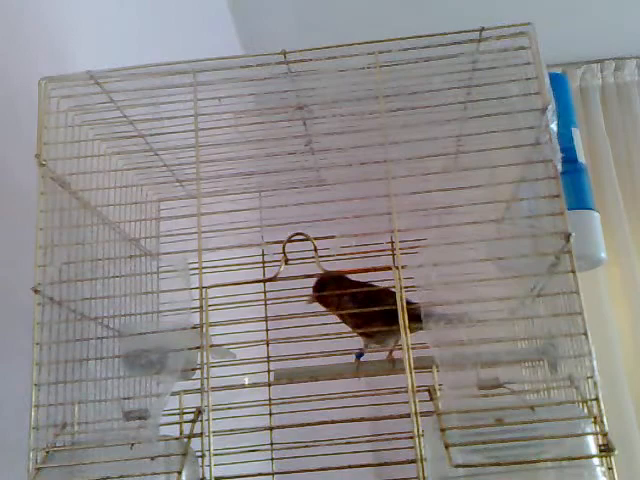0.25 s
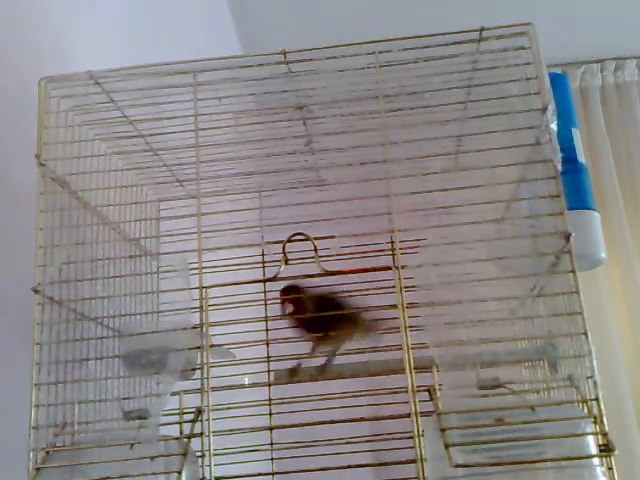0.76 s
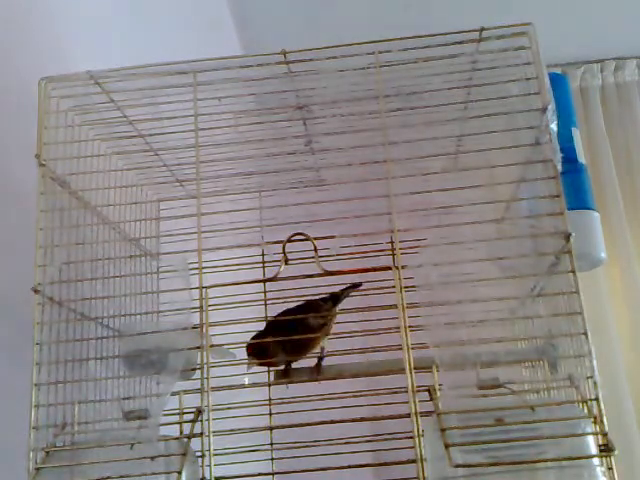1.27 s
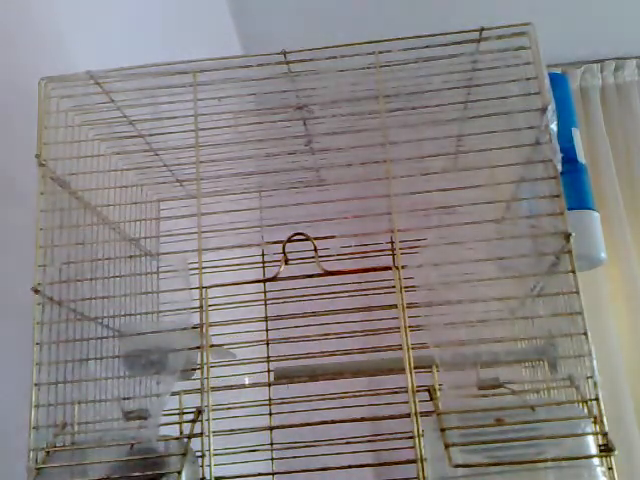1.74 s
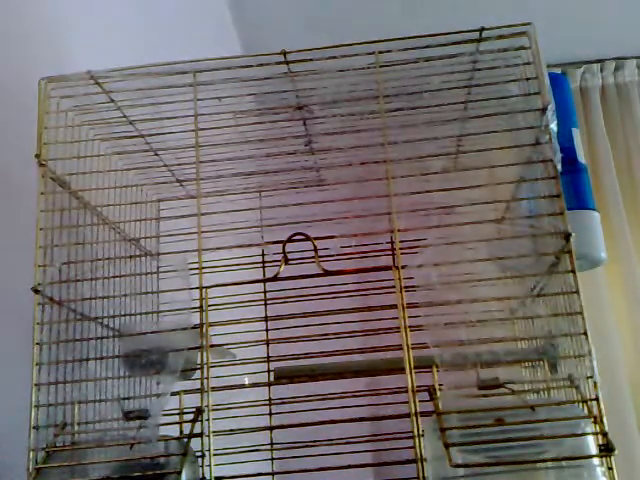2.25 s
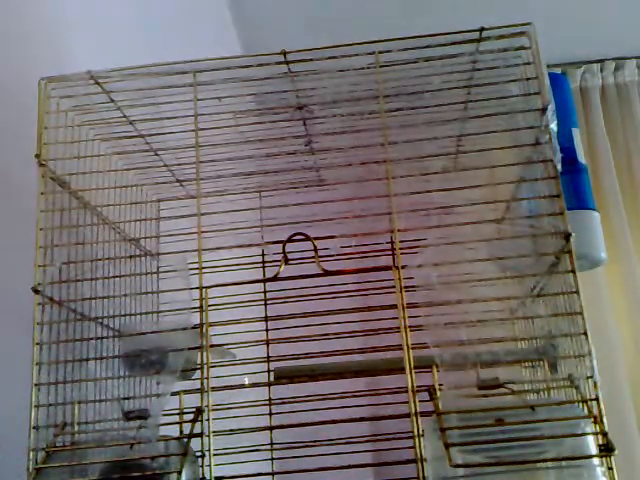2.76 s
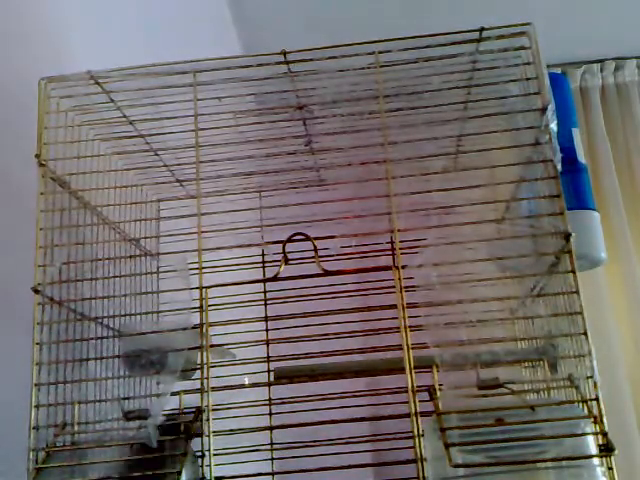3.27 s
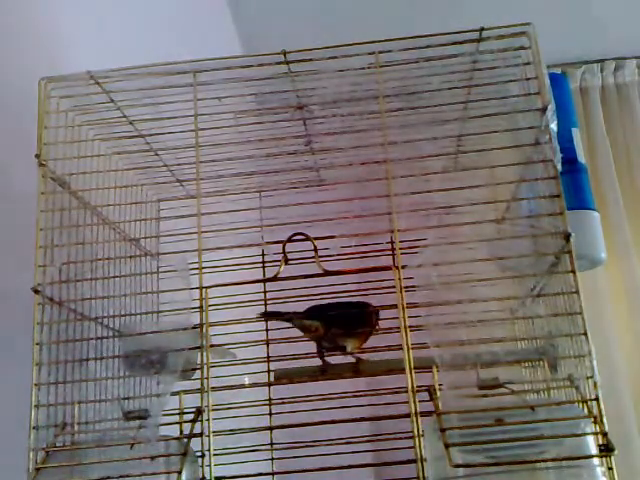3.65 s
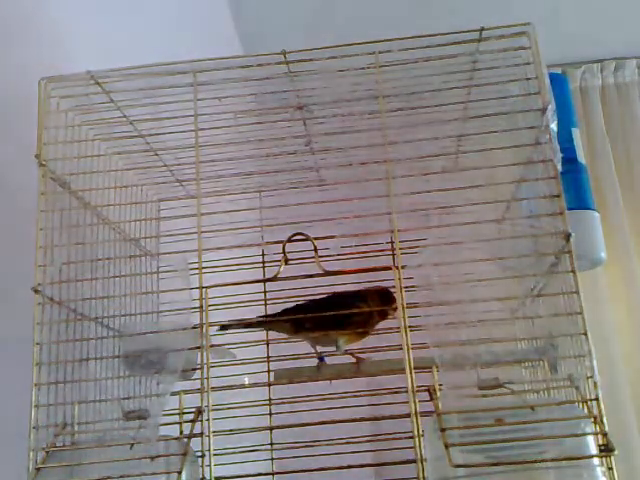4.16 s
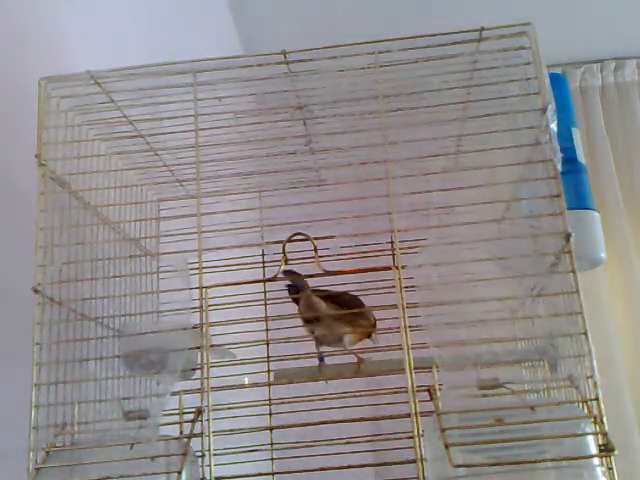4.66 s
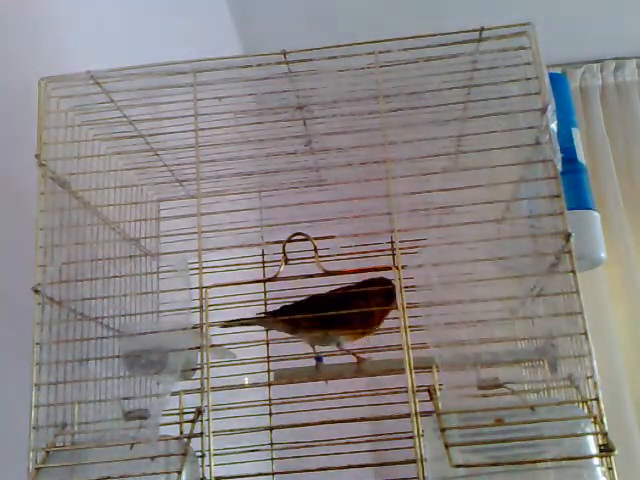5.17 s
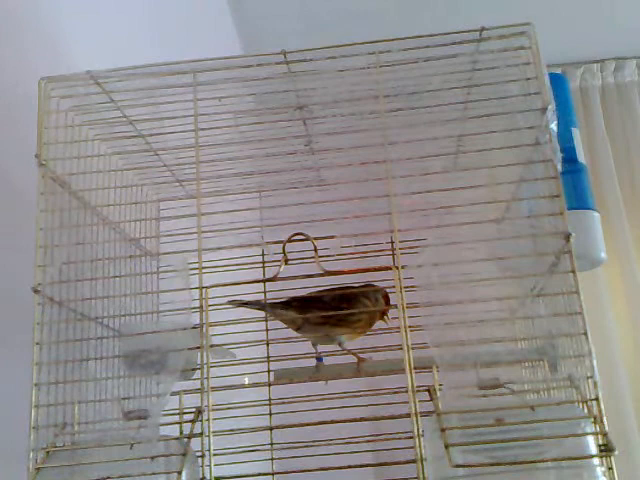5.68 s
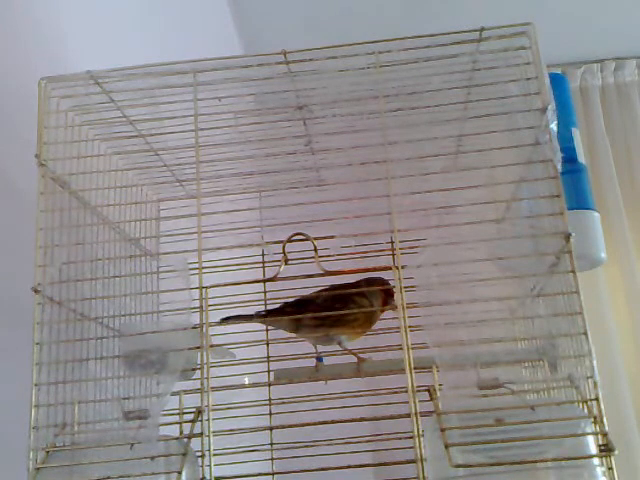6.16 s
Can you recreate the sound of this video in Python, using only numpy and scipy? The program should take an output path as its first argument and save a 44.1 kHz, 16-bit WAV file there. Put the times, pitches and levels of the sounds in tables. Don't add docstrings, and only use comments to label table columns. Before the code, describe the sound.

The sound opens on the tail of a high whistle, then at about 0.1 s a small finch close by gives a loud call: a rapid rising, fluttering buzz, a snapped, piercing whistle near 0.2 s, and a glide tumbling down until about 0.34 s. A short, small-room reflection follows, and the hiss sinks around 0.7 s before returning. Faint claw taps come near 0.9 and 1.25 s, then a clearer landing knock at 1.6 s, with soft scrabbles to 2.2 s. A thin wire tick falls at 2.6 s, light metallic bar ticks at 3.3 to 3.5 s, and dull tray touches between 4 and 4.6 s. At 5.35 s comes a second, brighter call: rough rising buzz, overlapping sharp whistles, and a falling glide ending by 5.6 s. Hiss dips again around 6 s, with one barely audible tick. Low rumble and faint stirred air continue throughout.

```python
import sys
import numpy as np
from scipy import signal
from scipy.fft import rfft, irfft, next_fast_len
from scipy.io import wavfile
from scipy.ndimage import uniform_filter1d

SR = 44100
rng = np.random.default_rng(int(sys.argv[2]) if len(sys.argv) > 2 else 0)


def master_out(mix):
    frames = np.transpose(np.atleast_2d(mix))
    ceiling = np.clip(frames, -1, 1)
    pcm = np.round(ceiling * 32767).astype(np.int16)
    wavfile.write(sys.argv[1], SR, pcm)


def volts(x):
    e = np.asarray(x, float) / 20
    return 10 ** e


N = 283058
LEAD = 4410

# time in seconds, pitch in Hz, level in dB, beak resonance in Hz.
BUZZ_CURVES = [
    [(.072, 1195, -44, 2504), (.09, 1334, -35, 2985), (.104, 1425, -22.5, 4400), (.136, 1832, -18.5, 3800),
     (.148, 1967, -12, 3700), (.16, 1955, -33.5, 4162), (.172, 1982, -51, 4475)],
    [(5.345, 1302, -43.5, 4437), (5.357, 1362, -21.5, 5150), (5.372, 1600, -15.5, 5600),
     (5.387, 1803, -16, 6700), (5.405, 1921, -15, 7300), (5.436, 1858, -30, 5600), (5.46, 1837, -34, 3700),
     (5.49, 1773, -41.5, 3700)],
]
# rate in Hz at start, rate in Hz at end, depth 0-1 at start, depth 0-1 at end.
BUZZ_FLUTTERS = [
    (622.7, 720, 0.1, 0.73),
    (597.4, 400, 0.2, 1),
]
# frequency in Hz, gain in dB.
THROAT_RESPONSE = [(1000, -19), (1400, -13), (2000, -16), (2500, -8), (3700, 0), (5500, -5), (7600, -7),
                   (8400, -36), (15000, -60)]
# frequency in Hz, density in dB per Hz.
BREATH_SPECTRUM = [(900, -35.5), (2200, -17), (3500, -12), (5500, -5.5), (7600, -13), (8600, -19),
                   (12000, -21.5), (15800, -24.5)]
# start in seconds, length in seconds, from Hz, to Hz, peak in dB.
WHISTLE_NOTES = [(-.06, 0.024, 6300, 2900, -7), (-.035, .02, 3583, 6550, -13),
                 (-.012, 0.016, 6300, 5000, -11), (0.165, .008, 5720, 6460, -21.5),
                 (0.168, .016, 6670, 6060, -15.5), (0.176, .014, 3192, 3210, -30),
                 (0.186, .005, 7644, 5470, -28.5), (.188, 0.02, 5203, 5127, -4.5),
                 (.204, .009, 5150, 5275, -7.5), (.211, .014, 5218, 5190, -8.5),
                 (.226, .03, 6000, 5400, -35), (0.262, .036, 5750, 5710, -20),
                 (0.301, .028, 5760, 5560, -39.5), (5.441, .008, 4994, 5180, -17),
                 (5.455, .011, 5240, 5100, -22.5), (5.448, .009, 3860, 3650, -15.5),
                 (5.458, .008, 3720, 3800, -18), (5.465, .022, 3657, 3550, -27),
                 (5.466, .012, 6940, 6795, -19), (5.473, .017, 6823, 6693, -12.5),
                 (5.496, .018, 6410, 5745, -17), (5.505, .024, 5850, 5750, -8),
                 (5.538, .04, 6097, 5700, -29)]
# time in seconds, pitch in Hz, level in dB.
GLIDE_CURVES = [
    [(.222, 5364, -21.5), (.248, 4744, -31), (.264, 4360, -31), (.28, 4070, -15), (.296, 3616, -9.5),
     (.306, 3393, -17.5), (.32, 3057, -17), (.338, 2320, -40)],
    [(5.488, 5378, -38.5), (5.497, 5025, -28.5), (5.515, 4570, -16.5), (5.527, 3771, -8.5),
     (5.537, 3335, -12.5), (5.545, 3300, -7.5), (5.565, 2613, -22), (5.588, 2309, -41.5)],
]
# time in seconds, level
# in dB.
ONSET_POPS = [
    (0.1899, -8.5),
    (0.195, -17),
]
# time in seconds, level in dB, scrabble length in seconds.
CLAW_CONTACTS = [
    ((252, .5, -30), [(.918, -42.5, 0.022), (1.25, -38.5, 0.029), (3.957, -44, .017), (4.409, -35.5, 0.051), (4.555, -38, 0.031)]),
    ((936, 0.42, -20), [(1.792, -59.5, .015), (1.826, -57.5, .04), (2.109, -51, .016), (2.153, -37.5, 0.025), (3.399, -59, .027), (3.581, -53, 0.016), (4.448, -64, 0.042)]),
    ((950, 1.1, -15), [(.908, -59.5, 0.033), (1.632, -30, .011), (1.745, -57.5, .02), (5.504, -52, 0.015)]),
    ((1210, 0.81, -8), [(1.665, -45, 0.047), (2.083, -51, 0.019), (2.864, -51.5, 0.017), (3.441, -40.5, .019), (3.458, -46.5, 0.0127)]),
    ((1930, 1.04, -6.5), [(3.276, -40.5, .009), (3.283, -38, 0.018)]),
    ((3600, 0.32, -31), [(.84, -50, 0.0033), (3.937, -50, 0.0057), (6.184, -57, 0.0058)]),
    ((1900, 0.89, -26), [(2.688, -54, 0.0685), (2.923, -62.5, 0.0073)]),
    ((5750, 0.24, -15.5), [(3.283, -44, 0.013)]),
    ((7400, 0.27, -25), [(2.604, -37, .009)]),
]
# frequency in Hz, level in dB.
CAGE_MODES = [(180, 8), (240, -0.5), (330, -5.5), (450, -5.5), (600, 0), (760, 9), (900, 1), (1080, 3),
              (1250, 6.5), (1500, -6), (1850, -1), (2300, 8.5), (2650, -4.5), (3100, 1), (3600, -0.5),
              (4100, -7), (4900, 10.5), (5500, 7.5), (6400, -11), (7600, 4), (8800, 1), (11000, 1.5)]
# delay in seconds, level in dB.
WALL_ECHOES = [(.0052, -14), (.009, -13), (0.0135, -13), (.017, -13.5), (0.026, -16), (0.044, -26)]
# upper edge in Hz, t60 in seconds, level in dB.
ROOM_TAIL = [(2180, 0.22, -18.5), (4400, .15, -4.5), (15500, 0.1, -10.5)]
# frequency in Hz, density in dB per Hz.
HISS_SPECTRUM = [(240, -31), (400, -10), (700, -9), (1400, -12), (3000, -14.5), (4800, -18), (6200, -22),
                 (7150, -22.5), (7500, -13.5), (7750, -10.5), (8100, -15), (9000, -17), (12000, -15),
                 (15800, -11)]
# deepest point in seconds, depth in dB, half width in seconds.
GAIN_DIPS = [
    (.74, -9.5, 0.27),
    (6.05, -5.5, .2),
]
# frequency in Hz, density in dB per Hz.
STIR_SPECTRUM = [(120, -5.5), (200, 4.5), (350, -5), (700, -14.5), (1500, -40)]
# time in seconds, rise in dB, half width in seconds.
STIR_RISES = [(.03, 4.5, .15), (1.5, 5, 0.21), (1.7, 7.5, .05), (2.2, 1, .06), (3.6, 4.5, 0.0747),
              (3.88, 2, 0.094), (4.65, 5, .2)]
# frequency in Hz, density in dB per Hz.
RUMBLE_SPECTRUM = [(15, -32.5), (30, -12.5), (41, 1), (52, 4), (63, -0.5), (78, -11), (110, -2.5),
                   (135, -13.5), (180, -13), (260, -49)]
# time in seconds, rise in dB, half width in seconds.
RUMBLE_SWELLS = [(1.45, 3.5, .2), (2.25, 3, .2), (3.45, 3.5, .1), (4.75, 4, 0.13), (5.8, 1.5, .08),
                 (6.35, 3.5, 0.081)]
# frequency in Hz, density in dB per Hz.
GRIT_SPECTRUM = [(800, -24), (2500, -17), (5000, -6.5), (6500, -15.5), (7400, -24), (8300, -3),
                 (11000, -3.5), (15800, -4)]


def buzzes(jitter=0.009, rasp=0.8, breath_db=-7, lower_side=1.6):
    out = np.zeros(N + LEAD)
    for rows, (first_hz, last_hz, first_depth, last_depth) in zip(BUZZ_CURVES, BUZZ_FLUTTERS):
        at, fade, (pitch_hz, level_db, beak_hz) = over_note(rows)
        size = len(at)
        flutter_hz = np.linspace(first_hz, last_hz, size)
        depth = np.linspace(first_depth, last_depth, size)
        pitch_phase = phase(pitch_hz * (1 + jitter * wobble(size, 400)))
        flutter_phase = phase(flutter_hz * (1 + 4 * jitter * wobble(size, 180)))
        voice, power = 0, 0
        for k in range(1, 8):
            swing = 0.48 * depth * (k - 1)
            roughness = rasp * depth * min(k / 3, 1.6) ** 2
            side_tones = [
                (0, 0.64),
                (-1.2, lower_side * swing),
                (-0.059, swing / lower_side),
                (0.77, 0.1623 * swing ** 2),
                (1.5, 0.2 * swing ** 2)]
            for step, share in side_tones:
                hz = np.maximum(k * pitch_hz + step * flutter_hz, 50)
                gain = share * volts(at_hz(THROAT_RESPONSE, hz) + beak_gain_db(hz, beak_hz))
                unsteady = 1 + roughness * wobble(size, 300)
                turn = k * pitch_phase + step * flutter_phase + rng.uniform(0, 2 * np.pi)
                voice = voice + gain * unsteady * np.sin(turn)
                power = power + gain ** 2
        air = volts(breath_db) * depth * coloured(BREATH_SPECTRUM, size)
        out[at] += fade * volts(level_db) * (voice / np.sqrt(power) + air)
    return out


def beak_gain_db(hz, beak_hz, peak_db=8, width_octaves=0.2, above_db_per_octave=-12):
    octaves = np.log2(hz / beak_hz)
    peak = peak_db * np.exp(-0.5 * (octaves / width_octaves) ** 2)
    return peak + above_db_per_octave * np.maximum(octaves, 0)


def whistles(jitter=0.0031, shimmer=0.1, airy_db=-20, airy_hz=450, mixing_db=-12, beak_low_hz=2050):
    out, squares = np.zeros((2, N + LEAD))
    for rows in [note_curve(*note) for note in WHISTLE_NOTES] + GLIDE_CURVES:
        at, fade, (pitch_hz, level_db) = over_note(rows)
        size = len(at)
        below_7400_octaves = np.minimum(np.log2(2 * pitch_hz / 7400), 0)
        second_db = -33 - 0.46 * level_db + 40 * below_7400_octaves
        turn = phase(pitch_hz * (1 + jitter * wobble(size, 330)))
        unsteady = 1 + shimmer * wobble(size, 250) + volts(airy_db) * wobble(size, airy_hz)
        tone = np.sin(turn) + volts(second_db) * np.sin(2 * turn)
        note = fade * volts(level_db) * unsteady * tone
        out[at] += note
        squares[at] += note ** 2
    sum_tones = filtered(out ** 2 - squares, 6, 7500, "high")
    return filtered(out, 6, beak_low_hz, "high") + volts(mixing_db) * sum_tones


def note_curve(start_s, length_s, from_hz, to_hz, peak_db, attack_s=0.003, release_share=0.4, edge_db=-17):
    share = np.array([0, min(attack_s / length_s, 0.4), 1 - release_share, 1])
    pitch_hz = from_hz + (to_hz - from_hz) * share
    level_db = peak_db + edge_db * np.array([1, 0, 0, 1])
    return np.transpose([start_s + length_s * share, pitch_hz, level_db])


def pops():
    clicks = np.zeros(N + LEAD)
    for s, level_db in ONSET_POPS:
        clicks[round(s * SR) + LEAD] = volts(level_db)
    return filtered(clicks, 2, [120, 4200], "band")


def claws(clicks_per_s=1500, uneven_db=-4.5, snap_db=-6, wires_hz=2500, ring_cycles=27.3, longest_s=0.061):
    size = 3000
    strikes, snaps = np.zeros((len(CAGE_MODES), N + LEAD)), np.zeros(N + LEAD)
    hz, mode_db = np.transpose(CAGE_MODES)[:, :, None]
    t = np.arange(size) / SR
    contacts = sorted(hit + place for place, hits in CLAW_CONTACTS for hit in hits)
    for s, level_db, length_s, centre_hz, spread_octaves, bright_db in contacts:
        hit = rng.random(size) < clicks_per_s / SR
        hit[0] = True
        envelope = np.exp(-(t / length_s) ** 2) / np.sqrt(1 + clicks_per_s * length_s)
        force = hit * volts(level_db) * envelope
        near = volts(-6 * (np.log2(hz / centre_hz) / spread_octaves) ** 2)
        near = near + volts(bright_db) * (hz > wires_hz)
        colour = near * volts(mode_db + uneven_db * rng.standard_normal(hz.shape))
        at = round(s * SR) + LEAD
        strikes[:, at:at + size] += force * colour * rng.standard_normal((len(hz), size))
        snaps[at:at + size] += force * volts(bright_db) * rng.standard_normal(size)
    rings = sum(ring(clicks, f, min(ring_cycles / f, longest_s)) for clicks, f in zip(strikes, hz[:, 0]))
    return rings + volts(snap_db) * np.diff(snaps, prepend=0)


def ring(clicks, hz, t60_s):
    r = volts(-60 / (t60_s * SR))
    w = 2 * np.pi * hz / SR
    return signal.lfilter([0, np.sin(w)], [1, -2 * r * np.cos(w), r * r], clicks + 1e-18)


def room(x, wall_cut_hz=6100):
    t = np.arange(SR // 2) / SR
    answer = np.zeros(len(t))
    for delay_s, level_db in WALL_ECHOES:
        answer[round(delay_s * SR)] -= volts(level_db)
    answer = filtered(answer, 1, wall_cut_hz, "low")
    low_hz = 100
    for high_hz, t60_s, level_db in ROOM_TAIL:
        band = filtered(rng.standard_normal(len(t)), 6, [low_hz, high_hz], "band")
        unit_energy = np.sqrt(2 * np.log(1000) / (t60_s * SR))
        answer += volts(level_db - 60 * t / t60_s) * band * (t > 0.004) * unit_energy
        low_hz = high_hz
    return x + signal.fftconvolve(x, answer)[:len(x)]


def background(hiss_db=-60, stir_db=-62, rumble_db=-52, stir_follows=0.4):
    gain_db = bumps(GAIN_DIPS)
    hiss = volts(hiss_db + gain_db) * coloured(HISS_SPECTRUM)
    stir_level_db = stir_db + stir_follows * gain_db + bumps(STIR_RISES) + 1.5 * wobble(N, 6.5)
    stir = volts(stir_level_db) * coloured(STIR_SPECTRUM)
    rumble = volts(rumble_db + bumps(RUMBLE_SWELLS)) * coloured(RUMBLE_SPECTRUM)
    return hiss + stir + rumble


def bumps(rows):
    t = np.arange(N) / SR
    return sum(db * np.exp(-0.5 * ((t - s) / width_s) ** 2) for s, db, width_s in rows)


def over_note(rows):
    s, *columns = np.transpose(rows)
    at = np.arange(round(s[0] * SR), round(s[-1] * SR))
    fade = signal.windows.tukey(len(at), 90 / len(at))
    return at + LEAD, fade, [np.interp(at / SR, s, column) for column in columns]


def phase(hz):
    return np.cumsum(hz) * 2 * np.pi / SR


def wobble(size, rate_hz):
    slow = filtered(rng.standard_normal(size + 2000), 2, rate_hz, "low")
    return slow[2000:] / np.sqrt(2.2 * rate_hz / SR)


def filtered(x, order, hz, kind):
    return signal.sosfilt(signal.butter(order, hz, kind, fs=SR, output="sos"), x)


def at_hz(points, hz):
    f, db = np.transpose(points)
    return np.interp(np.log(hz + 1), np.log(f), db)


def coloured(points, size=N):
    padded = next_fast_len(size)
    hz = np.fft.rfftfreq(padded, 1 / SR)
    spectrum = rfft(rng.standard_normal(padded)) * volts(at_hz(points, hz))
    noise = irfft(spectrum, padded)[:size]
    return noise / np.sqrt(np.mean(noise ** 2) + 1e-20)


def scene():
    bird = buzzes() + whistles()
    near = room(bird + claws()) + pops()
    return (near[LEAD:] + background())[None]


def roll_off(x):
    return signal.sosfilt(signal.butter(12, 15900, fs=SR, output="sos"), x)


def record(dry, grit_db=-35, smear_s=0.022, follow=0.55, quiet_db=-44, ceiling=2.0):
    power = uniform_filter1d(np.diff(dry, prepend=0) ** 2 * 2.5, int(smear_s * SR))
    loud = np.maximum(power - volts(quiet_db) ** 2, 0) ** (follow / 2)
    x = dry + volts(grit_db) * loud * coloured(GRIT_SPECTRUM)
    return roll_off(ceiling * np.tanh(x / ceiling))


dry = scene()
out = record(dry)
master_out(out)
```